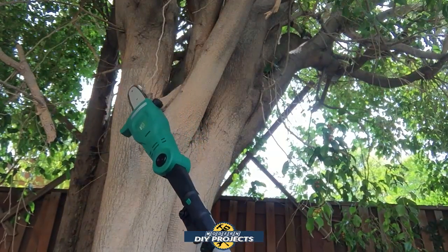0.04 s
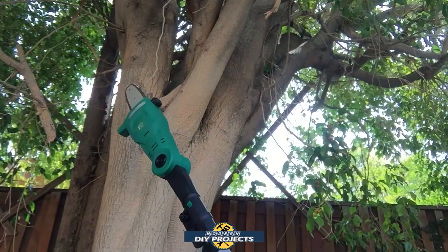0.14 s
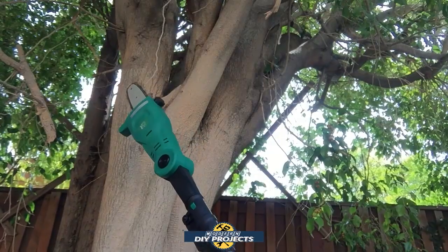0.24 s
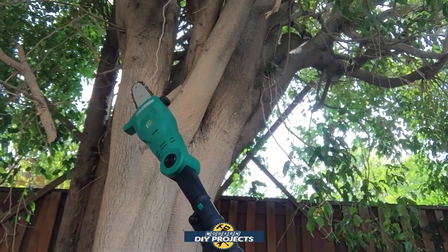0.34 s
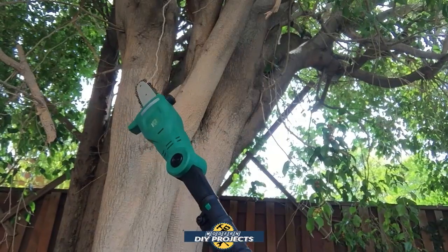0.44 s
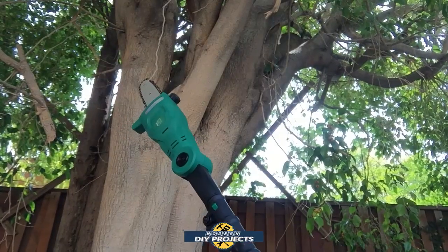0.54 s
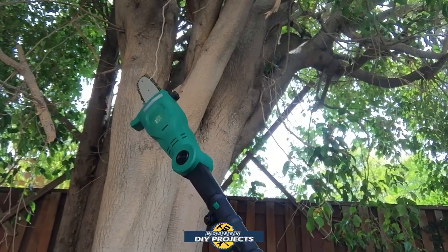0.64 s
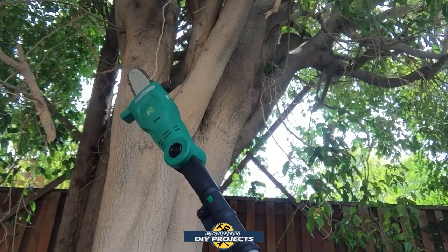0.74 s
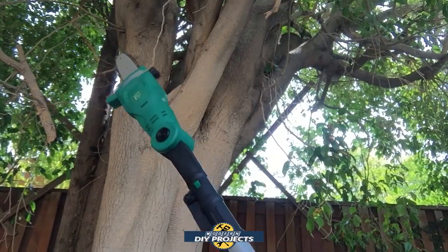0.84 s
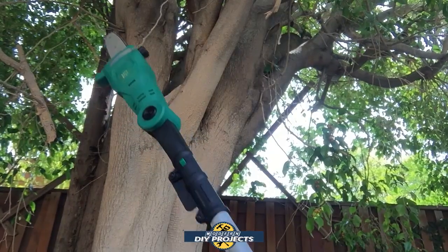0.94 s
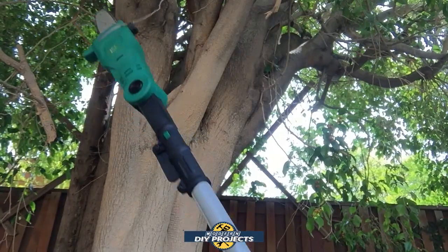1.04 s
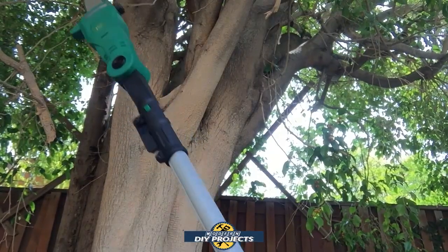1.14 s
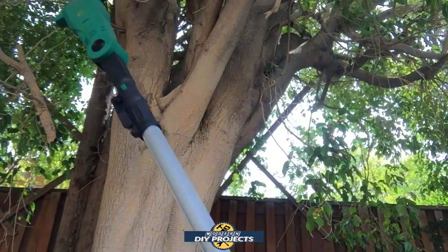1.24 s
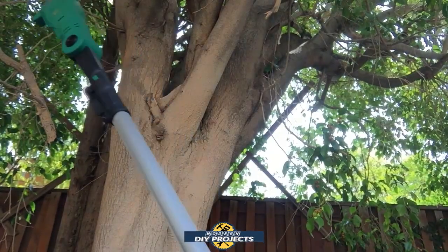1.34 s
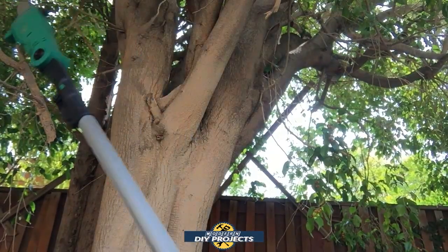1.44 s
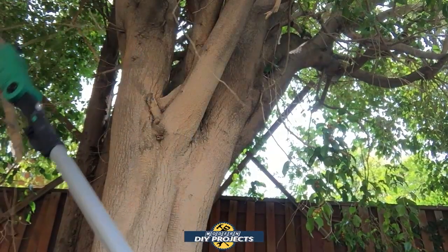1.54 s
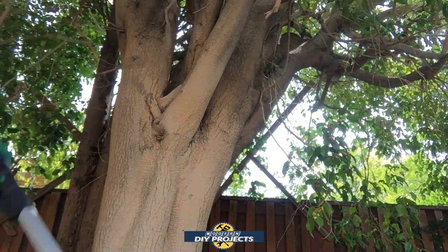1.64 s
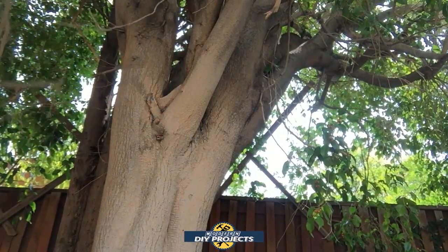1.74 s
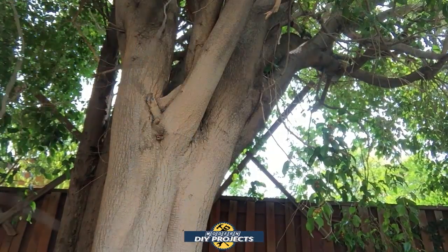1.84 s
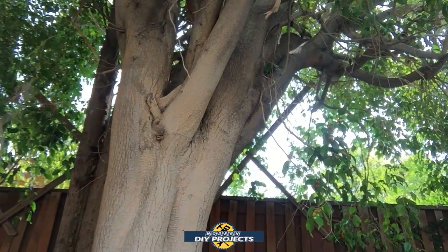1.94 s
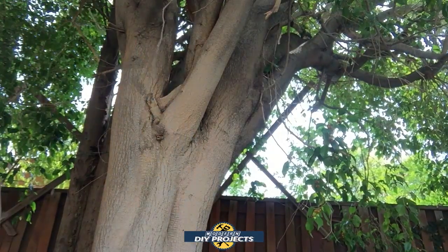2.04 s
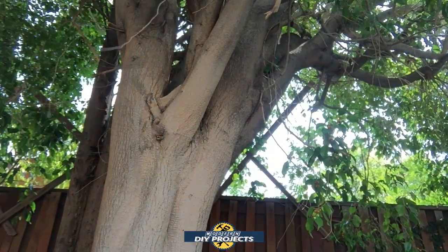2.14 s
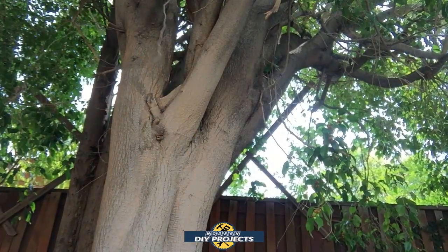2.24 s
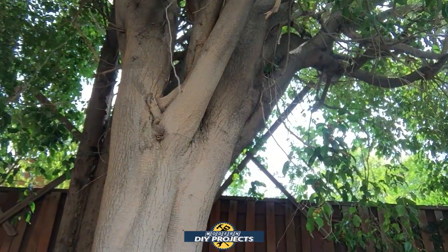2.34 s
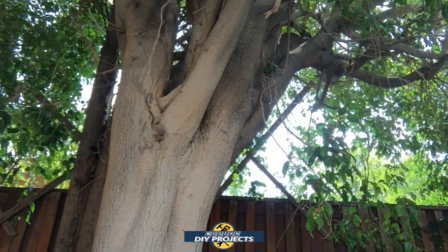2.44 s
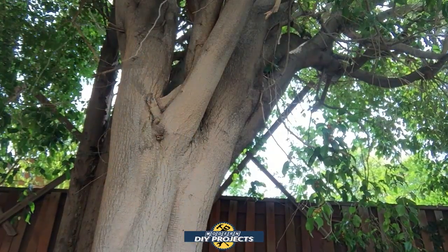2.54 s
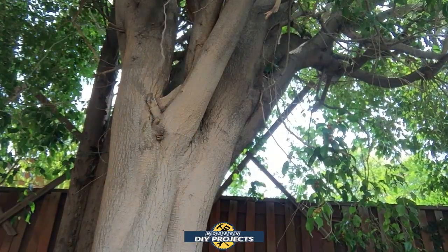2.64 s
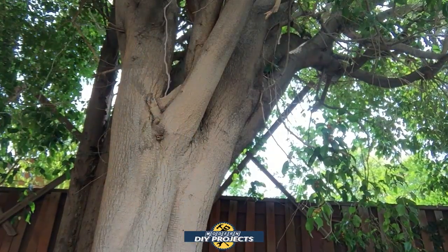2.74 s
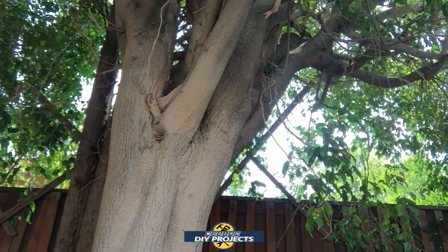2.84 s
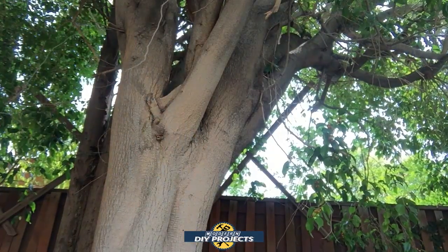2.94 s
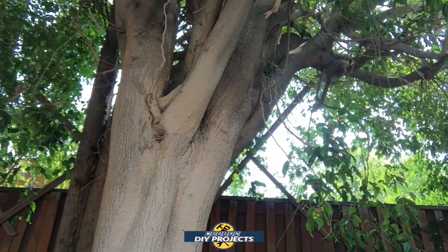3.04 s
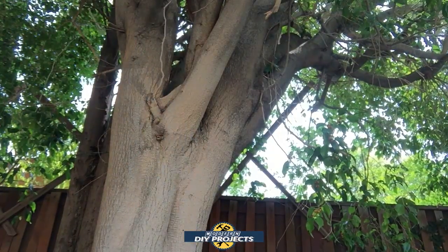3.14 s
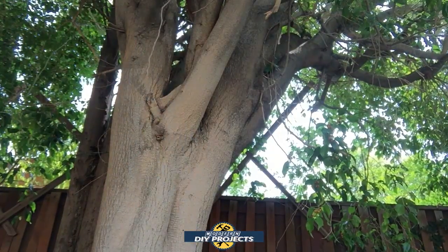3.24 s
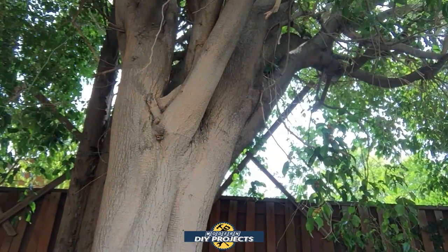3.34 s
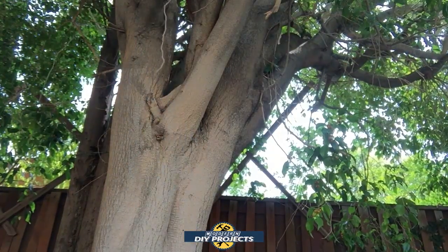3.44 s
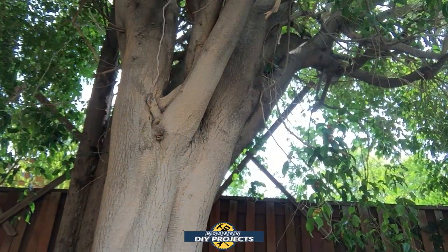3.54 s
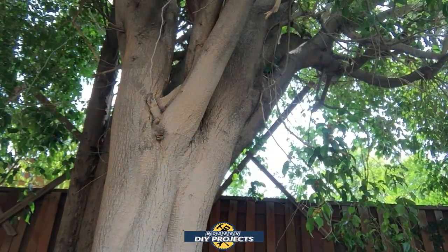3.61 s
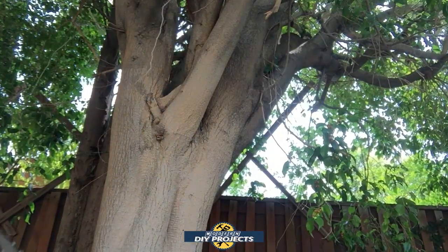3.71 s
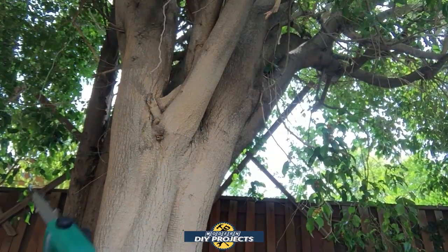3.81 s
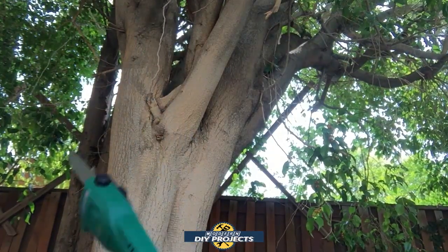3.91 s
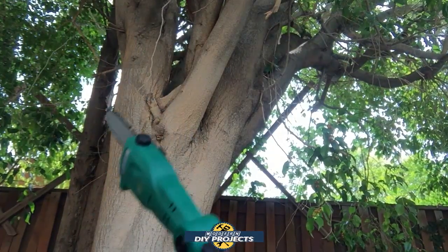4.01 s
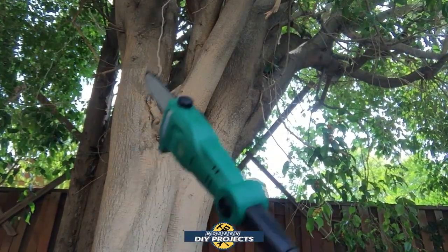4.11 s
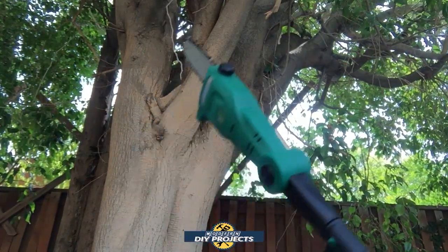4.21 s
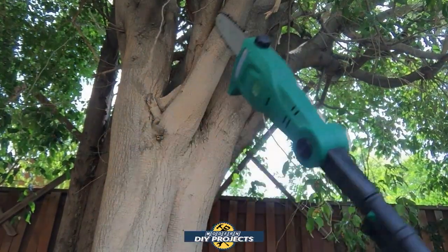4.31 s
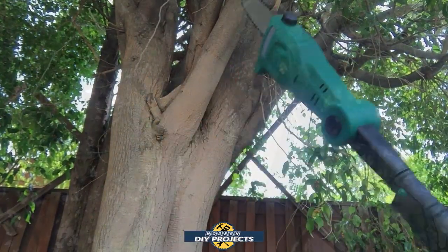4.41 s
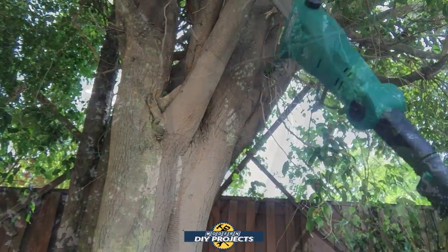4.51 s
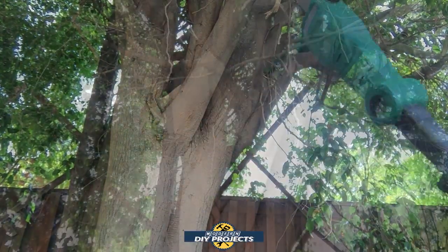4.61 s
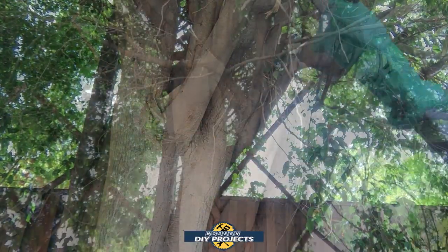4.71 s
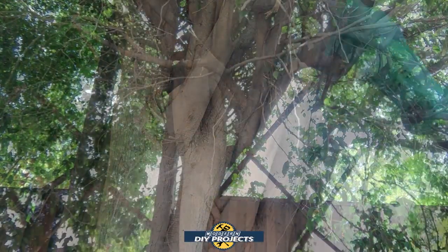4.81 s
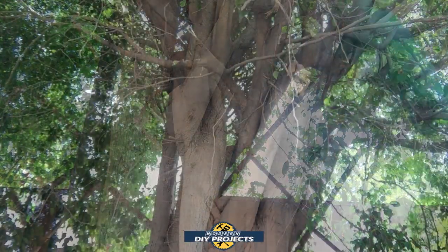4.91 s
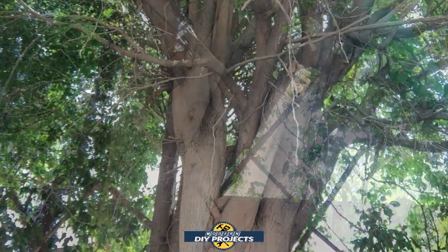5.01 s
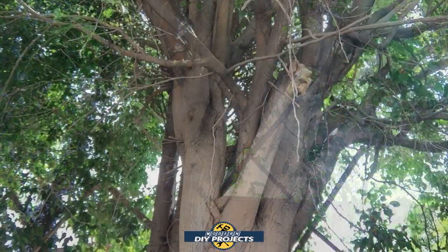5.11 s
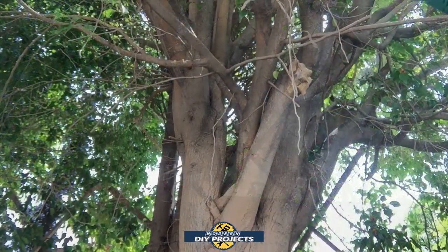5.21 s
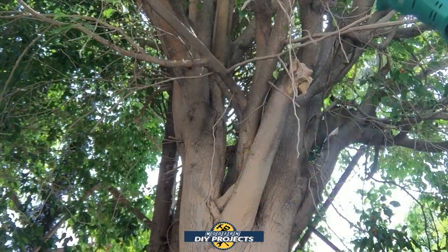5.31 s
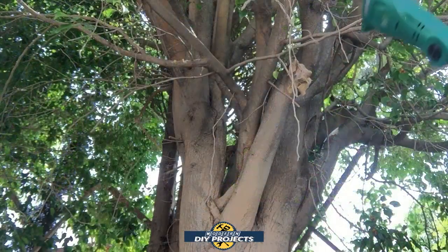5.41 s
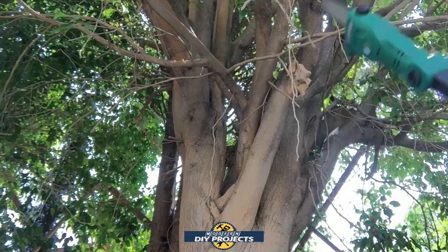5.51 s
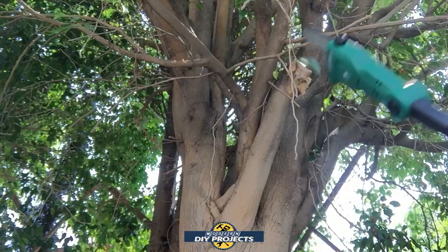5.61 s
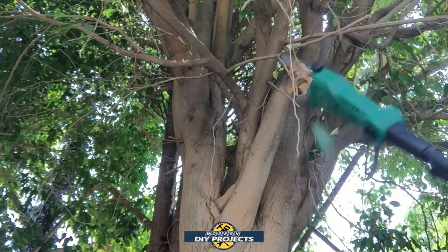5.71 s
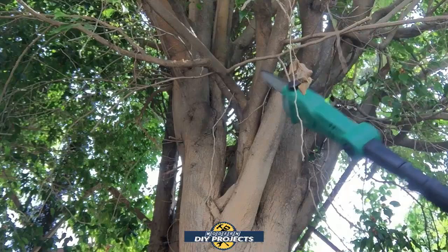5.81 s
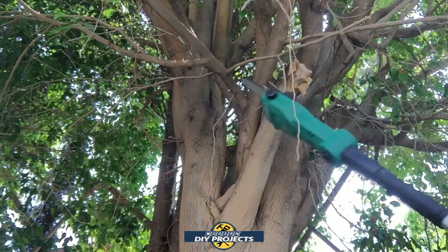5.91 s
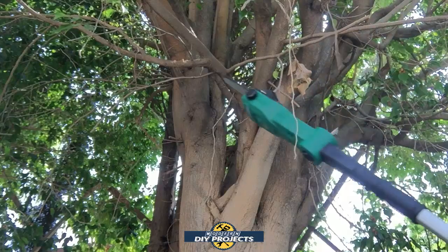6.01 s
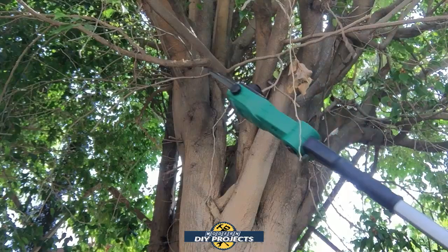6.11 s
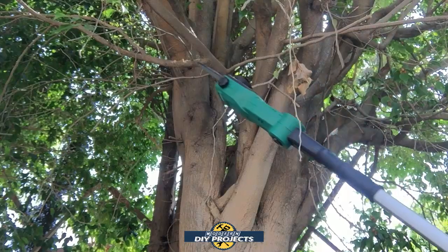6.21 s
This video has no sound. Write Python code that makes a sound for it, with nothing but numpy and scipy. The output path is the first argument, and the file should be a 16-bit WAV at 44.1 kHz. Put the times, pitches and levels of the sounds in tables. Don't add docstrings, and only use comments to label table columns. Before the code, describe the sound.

A small electric chainsaw runs down in about half a second, leaving quiet yard air, traffic rumble and a distant compressor hum. Woody cracks and thuds burst out as a branch drops through leaves, followed by sparse twig ticks and pole knocks. Near the end the motor whines up fast and the chain runs freely, its tone shifting slightly brighter. The microphone is near, with a short outdoor reflection.

```python
import sys
import numpy as np
from scipy import signal
from scipy.fft import rfft, irfft, next_fast_len
from scipy.io import wavfile
from scipy.ndimage import uniform_filter1d, map_coordinates

SR = 44100
rng = np.random.default_rng(int(sys.argv[2]) if len(sys.argv) > 2 else 0)


def store_wav(level_fs):
    pcm = np.round(np.clip(np.atleast_2d(level_fs), -1, 1) * 32767)
    wavfile.write(sys.argv[1], SR, pcm.T.astype(np.int16))


def how_loud(loudness_db):
    steps = np.asarray(loudness_db, float) / 20
    return 10 ** steps


N = 276066


def unit(x):
    return x / np.sqrt(np.mean(x ** 2) + 1e-20)


def along(points, hz):
    f, v = np.transpose(points)
    return np.interp(np.log(hz + 1), np.log(f + 1), v)


def curves(rows, off=None):
    s, *cols = np.transpose(rows)
    return [np.interp(np.arange(N) / SR, s, c, off, off) for c in cols]


def wobble(rate):
    return map_coordinates(rng.standard_normal(int(N * rate / SR) + 4), [np.arange(N) * rate / SR])


def filtered(x, response):
    m = next_fast_len(N + SR // 2)
    return irfft(rfft(x, m) * response(np.fft.rfftfreq(m, 1 / SR)), m)[:N]


def split(x, hz):
    low = filtered(x, lambda f: 1 / (1 + (f / hz) ** 6))
    return unit(low), unit(x - low)


def band(x, hz, octaves):
    lo, hi = np.clip(hz * 2. ** (np.array([-.5, .5]) * octaves), 30, SR / 2.2)
    sos = signal.butter(3, [lo, hi], "bandpass", fs=SR, output="sos")
    return signal.sosfilt(sos, x) * np.sqrt(SR / 2 / (hi - lo))


def crackle(per_s, spread_db, share):
    size_db = spread_db * np.clip(rng.standard_normal(N), -2, 2)
    clicks = (rng.random(N) < per_s / SR) * how_loud(size_db) * rng.standard_normal(N)
    return np.sqrt(share) * unit(clicks) + np.sqrt(1 - share) * rng.standard_normal(N)


def fuzzy(phase, width_hz):
    return np.sin(phase + np.cumsum(rng.standard_normal(N)) * np.sqrt(2 * np.pi * width_hz / SR))


def tipped(t):
    return 1 / (1 + np.exp((5.66 - t) / .05))


FREE_HZ = 296.3

# time in seconds, shaft speed in Hz.
COAST_DOWN = [(0, 198.3), (.13, 154.8), (.45, 85), (.62, 30)]


def speed():
    trigger_s, spin_up_s, sag_hz = 4.91, .058, 4.3
    t = np.arange(N) / SR
    spin_up = 1 - np.exp(-np.maximum(t - trigger_s, 0) / spin_up_s)
    return np.maximum(curves(COAST_DOWN)[0], FREE_HZ * spin_up - sag_hz * tipped(t))


RUN_DB = -25


def drive():
    stop_s, coast_db, fade_power = .61, -25, 1.044
    bite_s, bite_rise_s = 4.931, 0.023
    t = np.arange(N) / SR
    coast = how_loud(coast_db) * np.clip(1 - t / stop_s, 0, 1) ** fade_power
    run = how_loud(RUN_DB) * (1 - np.exp(-np.maximum(t - bite_s, 0) / bite_rise_s))
    return 20 * np.log10(coast + run + 1e-7)


# start pitch in Hz, end pitch in Hz, share of the slide made as it tips [0..1].
CASING_SLIDES = [(5450, 6880, .1), (3579, 3930, 0.22), (2670, 3240, 0.99), (1260, 1600, .3)]


def sliding(x, width_hz):
    hz, t, z = signal.stft(x, SR, nperseg=512)
    tip = tipped(t)
    turned = np.interp(t, (4.9, 6.36), (0, 1))
    tracks = [a + (b - a) * (jump * tip + (1 - jump) * turned) for a, b, jump in CASING_SLIDES]
    lift = sum(np.exp(-((hz[:, None] - c) / width_hz) ** 2) for c in tracks)
    patches = uniform_filter1d(uniform_filter1d(rng.standard_normal(z.shape), size=4, axis=0), size=9, axis=1)
    lift_db = lift * np.interp(tip, (0, 1), (2, 4))
    return signal.istft(z * how_loud(1.3 * unit(patches) + lift_db), SR, nperseg=512)[1][:N]


# multiple of the shaft speed, level in dB, line width in Hz,
# dB gained per unit of slack, dB gained as the saw tips.
MOTOR_TONES = [(1, -53.5, 2.5, -66, 2), (2, -44, 2.3, -38, 1), (3, -55, 9.5, -19, 7.5),
               (4, -52.5, 16.2, -19, -9), (6, -49.5, 18.3, -20, 4), (7, -49, 15.96, -25, 2.5),
               (8, -46, 24.7, 3, 0), (9, -40.5, 15, -35, -6)]
GEAR_MESH = [(14, -51, 35, -40, 5), (15, -52, 30, -40, 4)]
# multiple of the shaft speed,
# best shaft speed in Hz, Hz off it per root dB lost, level in dB, line width in Hz.
GEAR_WHINE = [(15, 208, 18, -28, 110), (6, 205, 34, -31.5, 60), (7, 190, 16, -32.5, 60),
              (21.3, 145, 9, -33, 110)]
# frequency in Hz, level in dB per Hz.
COASTING_COLOUR = [(150, -60), (250, -59), (443, -19), (500, -17), (708, -24), (772, -14), (1020, -14.5),
                   (1210, -3.5), (1710, -12), (2840, -2.5), (5030, -8.5), (7360, -9.5), (10600, -20.5),
                   (11600, -16.5), (15800, -23)]
# frequency in Hz, level in dB per Hz.
RUNNING_COLOUR = [(120, -60), (200, -36), (258, -40), (288, -12.5), (447, -9), (588, -8.5), (706, -5),
                  (1180, 1), (1580, -7.5), (3160, -1.5), (4990, -5.5), (6330, -3), (7890, -9.5),
                  (12900, -11.5), (15800, -16)]
# resonance in Hz, width in Hz, lift in dB.
SHELL = [(1290, 360, 8.5), (2870, 430, 0), (875, 240, 9)]


def saw():
    shaft_hz, level_db = speed(), drive()
    shaft = 2 * np.pi * np.cumsum(shaft_hz) / SR
    gear = 6.85
    sprocket = shaft / gear
    coasting = np.arange(N) < N // 2
    slack = 1 - shaft_hz / 300
    beat_db = (0.6 + 0.73 * slack) * np.cos(sprocket - 1.3) + 0.99 * np.cos(2 * sprocket) + 0.94 * np.cos(shaft)

    clatter = crackle(6000, 2.3, 0.19) * how_loud((0.35 + 2.4 * slack) * wobble(70))
    shell_db = lambda f: sum(db * np.exp(-((f - c) / w) ** 2) for c, w, db in SHELL)
    slow = filtered(clatter, lambda f: how_loud(along(COASTING_COLOUR, f) + shell_db(f)))
    fast = sliding(filtered(clatter, lambda f: how_loud(along(RUNNING_COLOUR, f))), width_hz=260)
    body, fizz = np.where(coasting, split(slow, 7000), split(fast, 7000))
    fizz_db = np.where(coasting, -3.5, -6.5) + 1.13 * 20 * np.log10(shaft_hz / FREE_HZ)
    chain = how_loud(beat_db) * body + how_loud(fizz_db + 0.99 * beat_db) * fizz

    tones, tip = np.zeros(N), tipped(np.arange(N) / SR)
    teeth = [(12 / gear, -51, 6, -30, 0), (16 / gear - .05, -56, 6, -30, 0)]
    for turns, db, width_hz, slack_db, tip_db in [*MOTOR_TONES, *GEAR_MESH, *teeth]:
        swell_db = slack_db * np.minimum(slack, .36) + tip_db * tip
        tone_db = db + 30.0 + swell_db + beat_db + 1.53 * wobble(14)
        tones += how_loud(tone_db) * fuzzy(turns * shaft, width_hz)

    change = np.clip(np.abs(np.gradient(shaft_hz)) * SR / np.where(coasting, 220, 800), 0, 1) ** 2
    over_db = level_db - RUN_DB
    change_db = np.where(coasting, over_db + 2.2 * beat_db, 4 * over_db + 2.5)
    whine = np.zeros(N)
    for turns, best_hz, off_hz, db, width_hz in GEAR_WHINE:
        gear_db = db - ((shaft_hz - best_hz) / off_hz) ** 2 + 2 * wobble(45)
        whine += how_loud(gear_db) * fuzzy(turns * shaft, width_hz)
    return how_loud(level_db) * (0.72 * chain + tones) + change * how_loud(change_db) * whine


# pitch in Hz, level in dB.
COMPRESSOR = [(59.2, -67.5), (215.3, -94), (290.7, -64), (349.9, -78), (581.4, -78.5), (640.6, -82)]
# frequency in Hz, level in dB per Hz.
AIR_COLOUR = [(15, -40), (25, -3.5), (72, 2.5), (152, -0.5), (235, -2), (291, 2), (449, -10), (572, -11.5),
              (791, -23), (881, -28), (2090, -17.5), (4950, -50), (6490, -49), (11700, -38.5), (15800, -60)]
# time in seconds, level in dB.
TRAFFIC_SWELLS = [(0, -69), (.35, -64), (.7, -57.5), (2.4, -60.5), (2.85, -63), (3.9, -58.5), (4.4, -61),
                  (6.26, -67.5)]
# time in seconds, effort in dB.
DRONE_EFFORT = [(0, -25), (.35, 2.5), (1.2, -5), (1.6, 2), (3, 0), (3.3, -7.5), (4, 0.5)]


def neighbourhood():
    t = np.arange(N) / SR
    colour = lambda f: how_loud(along(AIR_COLOUR, f)) / (1 + (f / 13000) ** 16)
    rumble, air = split(filtered(rng.standard_normal(N), colour), 170)
    traffic = how_loud(curves(TRAFFIC_SWELLS)[0] + 1.2 * wobble(5.06)) * rumble
    air = how_loud(-65.5 + 0.38 * wobble(3.2)) * air
    hum = np.zeros(N)
    for hz, db in COMPRESSOR:
        hum += 1.44 * how_loud(db + 1.63 * wobble(6)) * np.sin(2 * np.pi * hz * t + 0.52 * wobble(6.4))
    drone_hz, width_hz, drone_db = 157.9, 5.3, -63.5
    drone = unit(filtered(rng.standard_normal(N), lambda f: np.exp(-((f - drone_hz) / width_hz) ** 2 / 2)))
    moved_db = -7 * np.interp(t, (4.6, 5.8), (0, 1))
    return traffic + air + hum + how_loud(drone_db + curves(DRONE_EFFORT)[0] + moved_db) * drone


# start in
# seconds, length in seconds, level in dB, centre in Hz.
TWIG_SWEEPS = [(1.552, .05, -62, 6000), (1.604, .046, -49.5, 4000), (1.772, 0.029, -38, 2380),
               (1.822, .011, -47, 3500), (1.865, 0.027, -42, 1790), (1.915, 0.02, -43, 2000),
               (2.228, 0.069, -54, 5260), (2.495, 0.1, -51.5, 4300), (2.76, 0.13, -55.5, 5700),
               (2.95, 0.085, -66.5, 8000), (3.113, 0.069, -62, 6000), (3.222, .045, -65, 4960),
               (3.404, .029, -61, 5000), (3.657, 0.088, -66.5, 7900), (3.986, .034, -68, 7000),
               (4.145, .079, -57.5, 5600), (4.922, 0.013, -58, 2500)]
# start in seconds,
# length in seconds, level in dB, centre in Hz.
NARROW_CREAKS = [(.41, 0.02, -40.5, 456), (1.124, 0.044, -65.5, 3300), (0.479, 0.081, -50.5, 766),
                 (0.543, 0.044, -48, 1140), (1.769, .02, -38, 2080), (1.844, 0.094, -56, 370),
                 (2.852, .011, -51.5, 1970), (2.98, 0.035, -60.5, 1240), (3.338, .05, -66, 3360),
                 (3.943, 0.028, -59, 5770), (3.953, .06, -69, 3300), (4.2, 0.03, -59.5, 4260),
                 (4.21, 0.041, -60.5, 2150), (4.434, 0.039, -61, 1930), (4.533, 0.042, -58.5, 2320),
                 (4.616, .02, -70, 2410), (4.713, 0.037, -60, 2330)]


def swishes():
    out, ticks = np.zeros(N), crackle(1500, 1.9, 0.33)
    for rows, octaves in [(TWIG_SWEEPS, 2.24), (NARROW_CREAKS, 0.28)]:
        for s, length, db, hz in rows:
            start, u = round(s * SR), np.arange(round(2 * length * SR)) / (length * SR)
            shape = np.minimum(u / 0.16, 1) * how_loud(-5 * u - 41 * np.maximum(u - 1, 0))
            out[start:][:len(u)] += how_loud(db) * shape * band(ticks[start:][:len(u)], hz, octaves)
    return out


def twigs(level_db, count):
    s, pitch, size = rng.random((count, 3)).T
    hz, t = 1300 * 5.5 ** pitch[:, None], np.arange(600) / SR
    start = (s * (N - 1)).astype(int)
    gain = how_loud(level_db[start] - 4.4 * np.log(size + 0.028))
    grains = gain[:, None] * np.sin(2 * np.pi * hz * t) * np.exp(-t * hz / 2.3)
    return np.bincount((start[:, None] + np.arange(600)).ravel(), grains.ravel(), N)[:N]


# time in seconds, strength in dB.
SHAKING = [(0.5, -71), (1.5, -73), (1.66, -58.5), (1.73, -48), (1.85, -45.5), (1.94, -49.5), (2.02, -50.5),
           (2.16, -53.5), (2.28, -60.5), (2.4, -64), (2.69, -60.5), (2.89, -70.5), (3.32, -64), (3.75, -70),
           (4.39, -67.5), (4.93, -72.5)]
# frequency in Hz, level in dB per Hz.
LEAF_COLOUR = [(590, -23), (1000, -6), (1450, -2.5), (1820, -0.5), (3250, 0), (4810, -5.5), (5520, -4),
               (10400, -17), (13400, -17), (15800, -21)]


def leaves():
    level_db, = curves(SHAKING, -120)
    fizz_db = -69 + 1.31 * (level_db + 62)
    scrape_db = -69 + 0.58 * (level_db + 60.5) - 60 * (level_db < -100)
    clumps_db = np.clip((level_db + 78) / 8, .8, 2.2) * wobble(70)
    ticks = crackle(900, 3, .38) * how_loud(clumps_db)
    body, fizz = split(filtered(ticks, lambda f: how_loud(along(LEAF_COLOUR, f))), 6400)
    scrape = unit(filtered(ticks, lambda f: np.exp(-(np.log(f / 800 + 1e-9) / 0.71) ** 2)))
    rub = how_loud(level_db - 2.0) * body + how_loud(fizz_db) * fizz + how_loud(scrape_db) * scrape
    return twigs(level_db - 3.5, count=1600) + rub


def decaying(noise, shape, hz, octaves):
    burst = band(noise * shape, hz, octaves)
    return burst * np.linalg.norm(shape) / np.linalg.norm(burst)


# time in seconds, peak in dB, ring in Hz, crack in dB, thud in dB.
LIMB_HITS = [(1.483, -43, 1210, -18, -15), (1.5612, -41, 1340, -8, -23), (1.5867, -41, 1450, -12, -28),
             (1.5999, -22, 1080, -9, -15.5), (1.602, -26, 2000, -20, -30), (1.6276, -25.5, 1900, 7, -16),
             (1.717, -23, 1280, -1, -5), (1.7695, -27, 2450, -12, -24), (1.78, -23.5, 2100, -7.5, -16),
             (1.8924, -27, 2460, -5, -15), (2.036, -36.5, 2100, -11, -6.5), (2.061, -36, 3070, -3, -15),
             (2.089, -38.5, 5530, 5, -4), (2.1396, -40, 3100, -11, -5)]
# time in seconds, peak in
# dB, ring in Hz, crack in dB.
TWIG_SNAPS = [(0.8412, -67, 1150, 8), (0.9948, -49.5, 1440, -18), (1.1407, -54, 3280, -8),
              (2.4233, -41.5, 1950, -20), (2.5026, -31, 5900, -0.5), (2.5541, -39.5, 2310, -3),
              (2.656, -41, 2220, -18), (2.6846, -38, 2280, -8), (2.7833, -25.5, 2780, 5.5),
              (2.786, -30.5, 1160, -20), (2.915, -50, 1250, -5), (2.9811, -52, 1240, 2),
              (3.036, -49, 1200, -13), (3.1221, -38.5, 5400, 0), (3.236, -45.5, 5200, 4),
              (3.345, -52, 3990, -6), (3.3842, -47, 5900, -8), (3.417, -41.5, 4270, -1.5),
              (3.4425, -45, 2380, -5), (3.472, -46, 2870, -4), (3.6685, -51, 5240, -4),
              (3.942, -38, 2830, -26), (4.1433, -48, 6260, -5), (4.443, -49, 1850, -16),
              (4.7242, -44, 2130, -10), (4.8866, -53, 1340, -18), (4.9335, -48, 1400, 0)]


def knocks():
    out, t = np.zeros(N + SR), np.arange(SR // 10) / SR
    burst = how_loud(-60 * t / .006) + 0.29 * how_loud(-60 * t / 0.061)
    hits = [(*row, -5.5) for row in LIMB_HITS] + [(*row, -24.5, -2.5) for row in TWIG_SNAPS]
    for s, db, hz, crack_db, thud_db, top_db in hits:
        noise = rng.standard_normal((2, len(t)))
        ring = decaying(noise[1], how_loud(-60 * t / 0.024), hz, octaves=0.64)
        fizz_db = top_db + 0.71 * crack_db + 0.081 * (db + 31)
        crack = decaying(noise[0], burst, 4650, octaves=2.0)
        crack += how_loud(fizz_db) * decaying(noise[0], burst, 10900, octaves=0.98)
        thud = 2.3 * how_loud(thud_db) * decaying(noise[1], how_loud(-60 * t / 0.015), 520, octaves=1.9)
        out[round(s * SR):][:len(t)] += how_loud(db - 6.5) * (ring + 1.18 * how_loud(crack_db) * crack + thud)
    return out[:N]


# frequency in Hz, time to fall 60 dB in seconds.
YARD_DECAY = [(300, 0.27), (2000, 0.16), (6000, 0.23), (15000, 0.19)]


def yard(x):
    hz, t, z = signal.stft(rng.standard_normal(SR // 2), SR, nperseg=256)
    tail = signal.istft(z * how_loud(-60 * t / along(YARD_DECAY, hz)[:, None]), SR, nperseg=256)[1]
    return signal.fftconvolve(np.pad(x, (200, 0)), tail / np.linalg.norm(tail))[:N]


def note(start, length, hz, db, flutter_db, rate, width_hz, edge_s, fade_db_s, droop_hz_s=0):
    t = np.arange(N) / SR - start
    edges = np.clip(np.minimum(t, length - t) / edge_s, 0, 1)
    shape = edges * how_loud(-fade_db_s * np.clip(t, 0, 1))
    phase = 2 * np.pi * t * (hz - droop_hz_s * np.clip(t, 0, length) / 2)
    return np.sqrt(2) * shape * how_loud(db + flutter_db * wobble(rate)) * fuzzy(phase, width_hz)


# start in seconds, length in seconds, pitch in Hz, level in dB.
BIRD_NOTES = [
    (2.06, .11, 5520, -65.5),
    (4.262, .135, 5450, -65),
]


def bird():
    return sum(note(*row, flutter_db=4.5, rate=180, width_hz=51, edge_s=0.0069, fade_db_s=80, droop_hz_s=870)
               for row in BIRD_NOTES)


# start in seconds, length in seconds, pitch in Hz, level in dB.
FAR_HOOT = (4.42, .42, 146, -54.5)


def hoot():
    return note(*FAR_HOOT, flutter_db=-1.0, rate=25, width_hz=1.5, edge_s=0.011, fade_db_s=-4)


def scene():
    hits, birds = knocks(), bird()
    near = saw() + hits + leaves() + swishes()
    answer = how_loud(-7.0) * yard(hits) + how_loud(-3) * yard(birds)
    return (near + answer + birds + hoot() + neighbourhood())[None]


def masked(x, floor_db, rise_db):
    hz, _, z = signal.stft(x, SR, nperseg=1024)
    power = uniform_filter1d(uniform_filter1d(np.abs(z) ** 2, size=16, axis=0), size=3, axis=1)
    threshold_db = floor_db + rise_db * (hz - 12500) / 3000
    threshold = how_loud(2 * threshold_db) * (hz > 12500)
    return signal.istft(z * (power > threshold[:, None]), SR, nperseg=1024)[1][:N]


def low_pass(x):
    return signal.sosfilt(signal.butter(12, 16510, fs=SR, output="sos"), x)


def record(dry):
    port_hz, width_hz, dip_db = 10470, 240, -4.5
    port = lambda f: how_loud(dip_db * np.exp(-((f - port_hz) / width_hz) ** 2))
    edges = lambda f: np.where(f < 15800, 1, .03) / (1 + (44 / (f + 1)) ** 4)
    heard = masked(filtered(dry[0], lambda f: port(f) * edges(f)), floor_db=-115, rise_db=10)
    return low_pass(heard[None])


dry = scene()
out = record(dry)
store_wav(out)
```